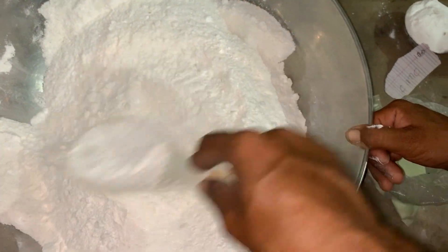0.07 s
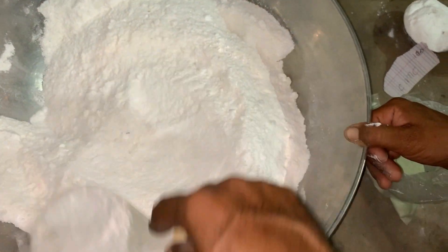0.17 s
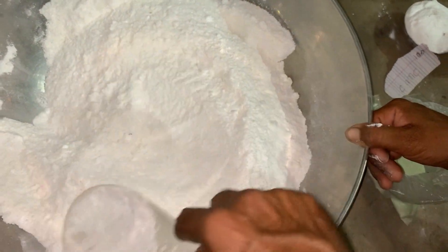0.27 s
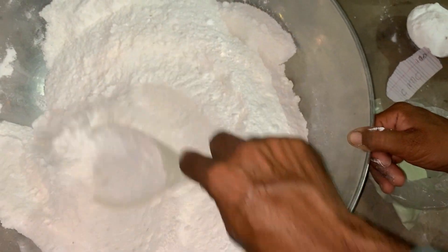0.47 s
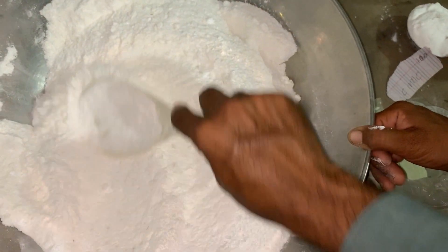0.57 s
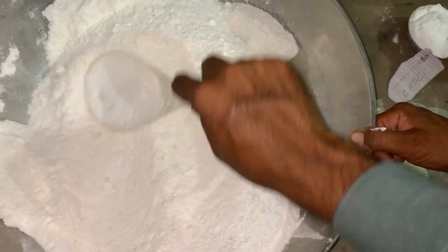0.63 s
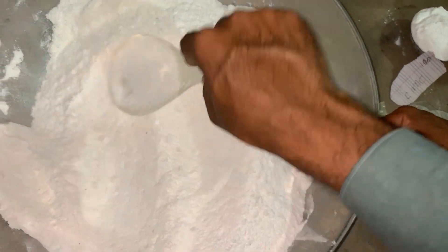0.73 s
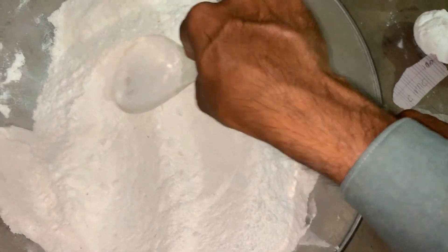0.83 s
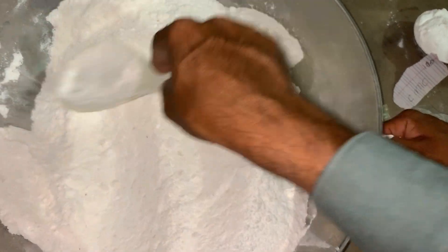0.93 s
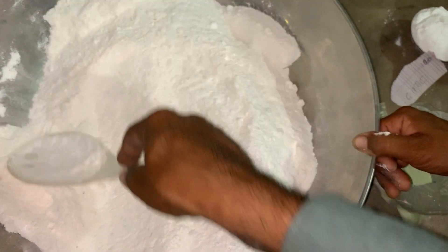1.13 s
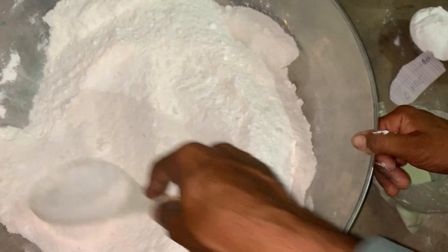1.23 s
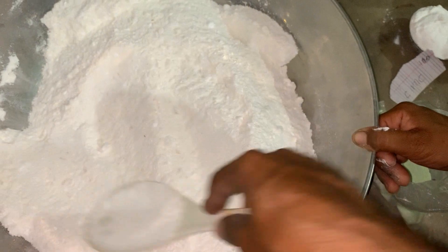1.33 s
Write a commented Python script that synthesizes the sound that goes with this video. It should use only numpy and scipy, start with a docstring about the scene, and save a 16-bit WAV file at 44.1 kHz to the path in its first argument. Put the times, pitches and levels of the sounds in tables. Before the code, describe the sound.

A scoop knocks once against a metal basin full of dry powder, then sweeps through the heap twice with a soft, grainy hiss and small crunches. The microphone is close, in a quiet room with a low rumble.

```python
"""A quiet room with a low rumble, the two microphone ports close to a wide metal basin of dry powder.
A scoop knocks once against the basin, its ring damped by the heap, then sweeps through the powder twice.
The powder hisses in fine grains and rustles under the push, and the heap shifts with a soft, low shudder.
Small lumps crunch; the scoop scuffs packed powder and squeaks faintly."""
import sys
import numpy as np
from scipy import signal
from scipy.fft import rfft, irfft, next_fast_len
from scipy.io import wavfile
from scipy.ndimage import map_coordinates

SR = 44100
rng = np.random.default_rng(int(sys.argv[2]) if len(sys.argv) > 2 else 0)


def transcribe(u):
    """Save the signal u as a 16-bit wav file named by the first command-line argument.

    u: samples, shape (n,) or (channels, n), limited to [-1, 1]; the rate is SR.
    q: integer samples, one column per channel.
    """
    v = np.clip(np.atleast_2d(u).T, -1, 1)
    q = np.round(v * 32767).astype(np.int16)
    wavfile.write(sys.argv[1], SR, q)


N = 61739

# modes of the loaded basin: (frequency [Hz], level [dB], t60 [s])
BASIN_MODES = [(219.5, -25.5, 0.021), (318.3, -17.5, 0.064), (354.6, -17, 0.043), (491.2, -14.5, 0.049),
               (615, -22, 0.015), (777, -24, 0.023), (741, -47, 0.26), (1030, -25.5, 0.029),
               (1229, -20.5, 0.02), (2027, -36, 0.023), (2720, -32, 0.019), (3377, -36, 0.073),
               (3620, -40, 0.052), (3770, -31, 0.06), (3860, -31.5, 0.061), (4483, -31, 0.03),
               (4930, -37, 0.025), (5620, -37, .016), (6310, -39, 0.023)]
# spectrum of powder being crushed: (frequency [Hz], relative level [dB])
CRUNCH_SPECTRUM = [(200, -10), (2300, -1), (5500, -2), (7200, 1.5), (9500, -5.5), (15000, -6)]
CRUNCH_RISE_S = 0.0002


def amp(db):
    """Decibels to gain."""
    return 10 ** (np.asarray(db) / 20)


def unit(x):
    """Scale to rms 1."""
    return x / np.sqrt(np.mean(x ** 2) + 1e-20)


def along(points, hz):
    """Interpolate (frequency [Hz], value) points on a log axis."""
    f, v = np.transpose(points)
    return np.interp(np.log(hz + 1), np.log(f + 1), v)


def clock():
    """Time of each sample in seconds."""
    return np.arange(N) / SR


def level(rows):
    """Gain per sample from (time [s], level [dB]) points."""
    return amp(np.interp(clock(), *np.transpose(rows)))


def wobble(per_s):
    """A smooth random curve with per_s knots a second."""
    return map_coordinates(rng.standard_normal(4096), [clock() * per_s + 2], mode="mirror")


def burst(start, rise, t60):
    """Envelope with a quick rise and an exponential decay."""
    t = np.maximum(clock() - start, 0)
    return (1 - np.exp(-t / rise)) * np.exp(-np.log(1000) * t / t60)


def swell(centre, reach):
    """Smooth envelope extending reach seconds to either side of its centre."""
    return np.cos(np.pi * np.clip((clock() - centre) / reach, -1, 1) / 2) ** 4


def filtered(x, response):
    """Pass x through a complex frequency response."""
    m = next_fast_len(N + SR // 2)
    return irfft(rfft(x, m) * response(np.fft.rfftfreq(m, 1 / SR)), m)[..., :N]


def coloured(x, spectrum, tilt_db=0):
    """Shape x with a spectrum and a tilt per octave above 1 kHz, at rms 1."""
    def response(hz):
        return amp(along(spectrum, hz) + tilt_db * np.log2(np.maximum(hz, 1000) / 1000))
    return unit(filtered(x, response))


def noise():
    """White noise."""
    return rng.standard_normal(N)


def grains(per_s=5000, share=0.56, spread_db=2):
    """Countless tiny slips of uneven size carry a share of the power; the rest is smooth hiss."""
    hit = rng.random(N) < per_s / SR
    size = amp(spread_db * np.minimum(rng.exponential(size=N), np.pi))
    slips = unit(hit * size * np.sign(noise()))
    return np.sqrt(share) * slips + np.sqrt(1 - share) * noise()


def ports(x):
    """Direct sound reaches the two microphone ports with a difference of phase and level."""
    # phase between the ports: (frequency [Hz], left lead [rad])
    lead = [(20, 0), (330, .35), (1300, .45), (1900, .9), (3100, -.9), (4300, -.3), (5500, 1.7), (6600, .3),
            (8600, 1.4), (10700, 3.14), (12500, 4.4), (14700, 6.2)]
    # balance of the ports: (frequency [Hz], left over right [dB])
    balance = [(100, -.4), (300, 1.6), (500, 0), (1200, 1.2), (4400, 2), (8000, 0)]
    half = np.array([[.5], [-.5]])
    return filtered(x, lambda hz: amp(half * along(balance, hz)) * np.exp(1j * half * along(lead, hz)))


def room(x, wall_s=0.007):
    """The walls return a short diffuse tail, alike at both ports in the bass."""
    # decay of the room: (frequency [Hz], t60 [s])
    decay = [(150, 0.63), (500, 0.32), (1200, 0.24), (4000, 0.56), (12000, 0.06)]
    # likeness of the tail at the ports: (frequency [Hz], correlation [0-1])
    likeness = [(100, 0.87), (600, 0), (3000, 0)]
    hz, t, bands = signal.stft(rng.standard_normal((2, SR // 2)), SR, nperseg=256)
    turn = np.arccos(along(likeness, hz)) / 2
    bands *= np.array([np.cos(turn), np.sin(turn)])[:, :, None]
    bands *= np.exp(-np.log(1000) * t / along(decay, hz)[:, None])
    mid, side = signal.istft(bands, SR, nperseg=256)[1]
    onset = np.clip(np.arange(len(mid)) / SR / wall_s - 1, 0, 1)
    tail = np.array([mid + side, mid - side]) * onset
    return signal.fftconvolve(x[None], tail / np.linalg.norm(tail[0]), axes=1)[:, :N]


def rumble():
    """Steady low room tone, a small part of it differing between the ports."""
    # room tone: (frequency [Hz], relative level [dB])
    spectrum = [(25, -24), (44, 4.5), (70, 1), (90, -10.5), (115, -10), (170, -23.5), (400, -23),
                (700, -34.5), (1200, -33.5), (2000, -50.5), (5000, -55), (15000, -44)]
    side = amp(-14) * coloured(noise(), spectrum)
    mid = ports(coloured(noise(), spectrum))
    return amp(-59.5) * (mid + np.array([side, -side]))


def shudder():
    """The heap shifts in the basin with a soft, low shudder."""
    # movement of the heap: (time [s], level [dB])
    shift = [(0, -137), (.19, -65.5), (.25, -53), (.35, -51.5), (.4, -60), (.55, -57.5), (.66, -62.5),
             (.8, -67), (.97, -64), (1.05, -60), (1.13, -65.5), (1.4, -68.5)]
    # colour of the shudder: (frequency [Hz], relative level [dB])
    spectrum = [(30, -4.5), (55, 0.5), (120, 4), (200, -8), (320, -5.5), (550, -24), (2500, -55)]
    return level(shift) * coloured(noise(), spectrum)


def squeaks():
    """The scoop sticks and slips at a gliding pitch; uneven slipping blurs the squeak into a rub."""
    # squeaks: (centre [s], reach [s], pitch [Hz], glide [octaves/s], roughness [0-1], level [dB])
    rubs = [(0.162, 0.023, 2203, -3.5, 0.01, -62.5), (0.836, 0.066, 1232, 5.5, 0.03, -72),
            (0.968, 0.048, 1243, -0.5, .05, -75), (1.282, 0.019, 1580, 9.5, 0.02, -52.5)]
    out = np.zeros(N)
    for centre, reach, hz, glide, rough, db in rubs:
        t = np.clip(clock() - centre, -reach, reach)
        pitch = hz * 2 ** (glide * t) * (1 + rough * wobble(per_s=900))
        out += amp(db) * swell(centre, reach) * np.sin(2 * np.pi * np.cumsum(pitch) / SR)
    return out


def scuffs():
    """Packed powder gives way under the scoop: a swell of grains in one broad band."""
    # scuffs: (centre [s], reach [s], band centre [Hz], width [octaves], level [dB])
    patches = [(0.169, 0.05, 3160, 0.34, -65), (.74, .12, 2130, 0.27, -75.5),
               (1.121, 0.0047, 1580, 0.44, -57.5), (1.273, 0.045, 1035, 0.26, -58)]
    out = np.zeros(N)
    for centre, reach, band_hz, width, db in patches:
        band = filtered(grains(), lambda hz: np.exp(-(np.log2((hz + 1) / band_hz) / width / 2) ** 2))
        out += amp(db) * swell(centre, reach) * unit(band)
    return out


def lumps():
    """Each lump breaks under the scoop in a short spray of grains."""
    # breaking lumps: (time [s], level [dB], t60 [s], tilt [dB/octave])
    breaks = [(.2345, -55, .015, 1), (.3198, -41, .032, -1.5), (.326, -37, .022, .5), (.4195, -49, .007, 2),
              (.4255, -49, .014, 1.5), (1.1585, -43.5, .012, 0), (1.1645, -39.5, .009, 5.5),
              (1.257, -49, .014, 3), (1.3155, -44, .012, 1), (1.3212, -38.5, .013, 9)]
    out = np.zeros(N)
    for start, db, t60, tilt in breaks:
        crumbs = coloured(grains(per_s=2600, share=0.7), CRUNCH_SPECTRUM, tilt)
        out += amp(db) * burst(start, CRUNCH_RISE_S, t60) * crumbs
    return out


def powder():
    """Each sweep shears the powder into a grainy hiss and shoves it aside, in uneven slips."""
    # dull rustle of powder shoved aside: (time [s], level [dB])
    push = [(.15, -90.5), (.2, -55), (.33, -67.5), (.4, -64), (.49, -65), (.525, -56.5), (.57, -70.5),
            (.76, -74), (.84, -77.5), (1.1, -81.5), (1.125, -73), (1.18, -78), (1.28, -59.5), (1.32, -61.5),
            (1.4, -76)]
    # fine hiss, one list for each sweep: (time [s], level [dB])
    sweeps = [
        [(.135, -83.5), (.158, -70.5), (.2, -60), (.235, -60), (.3, -64), (.335, -54.5), (.39, -62.5),
         (.44, -57.5), (.49, -65), (.525, -55.5), (.555, -66), (.61, -86)],
        [(1.04, -82.5), (1.1, -69.5), (1.13, -59), (1.18, -61), (1.22, -59), (1.28, -52.5), (1.305, -55),
         (1.325, -53), (1.35, -55.5), (1.4, -55.5)],
    ]
    # brightness of each sweep: (tilt [dB/octave])
    tilts = [-1.5, -0.5]
    # colours of the rustle and the hiss: (frequency [Hz], relative level [dB])
    rustle_spectrum = [(100, 2.5), (350, 9), (650, 0.5), (1000, 7), (1500, 3), (2200, -12), (3200, -11.5),
                       (6000, -25), (15000, -41.5)]
    hiss_spectrum = [(500, -8), (2000, -0.5), (3500, -3), (5500, -3), (8000, 2.5), (10000, -1.5),
                     (12500, 4), (15500, 1)]
    fizz_hz, fizz_ref_db, slip_db = 10600, -54, 1.32
    out = level(push) * coloured(grains(), rustle_spectrum)
    for sweep, tilt in zip(sweeps, tilts):
        force = level(sweep)
        hiss = coloured(grains(), hiss_spectrum, tilt)
        fizz = filtered(hiss, lambda hz: hz > fizz_hz)
        brightness = (force / amp(fizz_ref_db)) ** 0.8  # a harder stroke is brighter
        out += force * (hiss - fizz + fizz * brightness)
    return out * amp(slip_db * wobble(per_s=130))


def basin_body(hz):
    """Gain of the basin's modes, widened by the loose powder lying on the metal."""
    power = 0
    for mode_hz, db, t60 in BASIN_MODES:
        width_hz = 94 * np.sqrt(mode_hz / 1000)
        power += amp(db) ** 2 * t60 / (1 + ((hz - mode_hz) / width_hz) ** 2) ** 2
    return np.sqrt(power)


def knock():
    """Each contact rings the basin and crushes powder; shaken powder rasps on in the same modes."""
    # the scoop grazes the basin, then strikes it: (time [s], level [dB], tilt [dB/octave])
    contacts = [(0.2013, -18, 3.5), (0.2028, 0.5, -0.5)]
    bend_s = 0.00061  # travel time of a 1 kHz bending wave; higher ones arrive sooner
    sag_hz, sag_s = 24.4, 0.022  # the modes start sharp and sag as the scoop settles
    drift_rad_per_khz = 0.16  # the phase drifts as powder shifts on the metal
    radiate_hz = 138.3  # the basin radiates little below this
    crack_db, rasp_db = -32.5, -35.5
    blow = np.zeros(N)
    for start, db, tilt in contacts:
        for hz, mode_db, t60 in BASIN_MODES:
            khz = hz / 1000
            arrival = start + bend_s / np.sqrt(khz)
            t = np.maximum(clock() - arrival, 0)
            cycles = hz * t + sag_hz * sag_s * (1 - np.exp(-t / sag_s))
            ring = np.sin(2 * np.pi * cycles + drift_rad_per_khz * khz * wobble(per_s=200.6))
            gain = amp(db + mode_db + tilt * np.log2(khz))
            blow += gain * burst(arrival, rise=0.5 / hz, t60=t60) * ring
        crack = coloured(noise(), CRUNCH_SPECTRUM, tilt_db=-2.5)
        blow += amp(db + crack_db) * burst(start, CRUNCH_RISE_S, t60=0.0072) * crack
        rasp = unit(filtered(grains(), basin_body))
        blow += amp(db + rasp_db) * burst(start, rise=0.0031, t60=0.22) * rasp
    return signal.sosfilt(signal.butter(2, radiate_hz, "high", fs=SR, output="sos"), blow)


def scene():
    """Knock and sweeps close to the microphone, with the room behind them."""
    blow = knock()
    scooping = powder() + lumps() + squeaks() + scuffs()
    reverb = amp(-18.5) * room(blow) + amp(-8) * room(scooping)
    return ports(blow + scooping + shudder()) + reverb + rumble()


def record(dry):
    """The recorder keeps nothing above its band limit."""
    return filtered(dry, lambda hz: hz < 15900)


dry = scene()
out = record(dry)
transcribe(out)
```